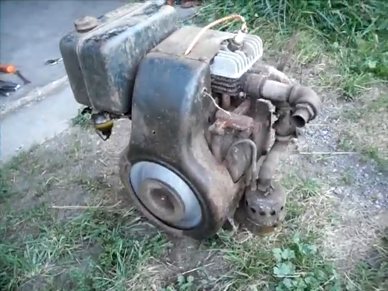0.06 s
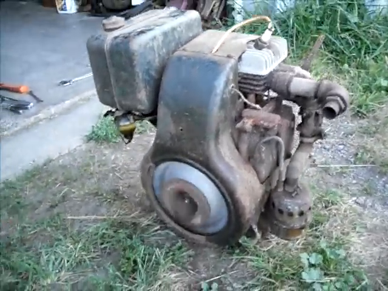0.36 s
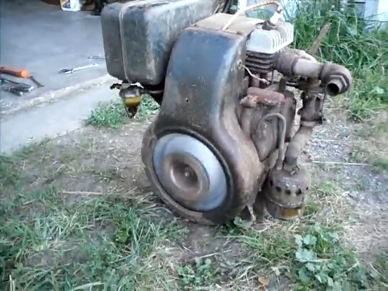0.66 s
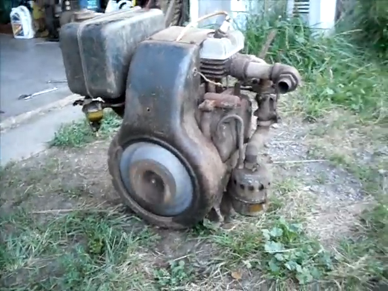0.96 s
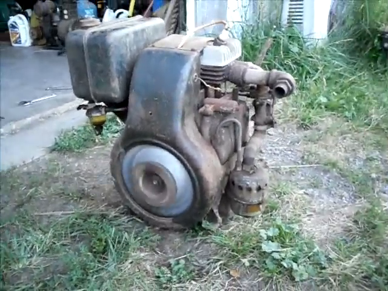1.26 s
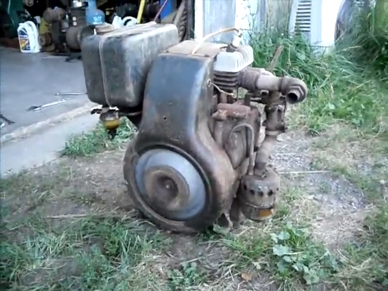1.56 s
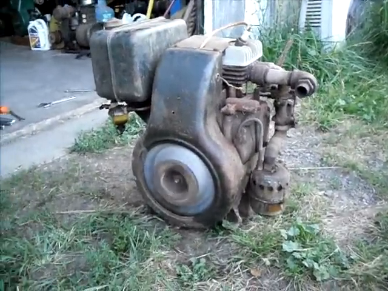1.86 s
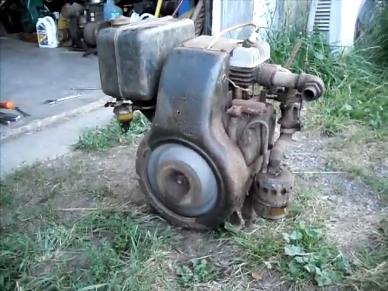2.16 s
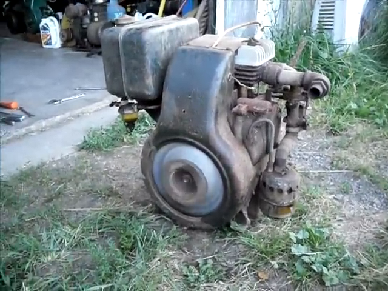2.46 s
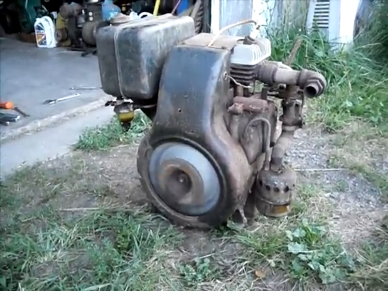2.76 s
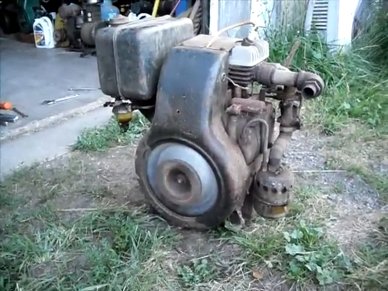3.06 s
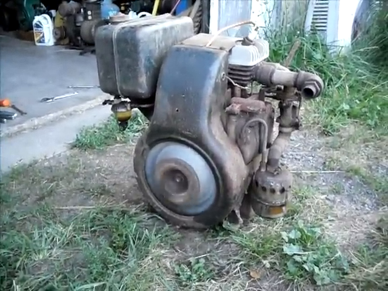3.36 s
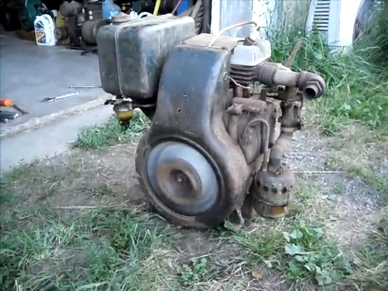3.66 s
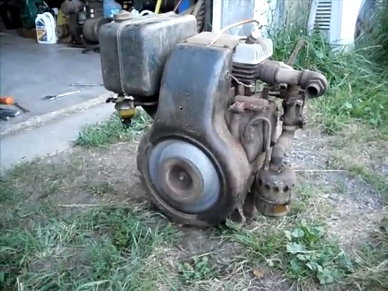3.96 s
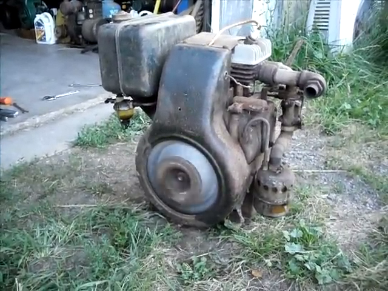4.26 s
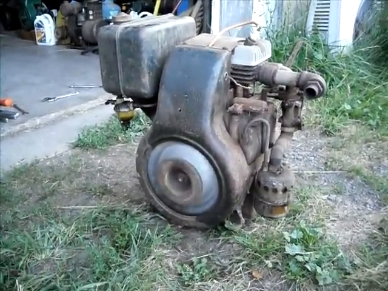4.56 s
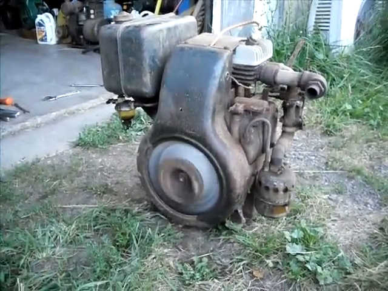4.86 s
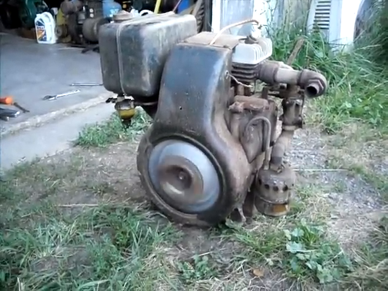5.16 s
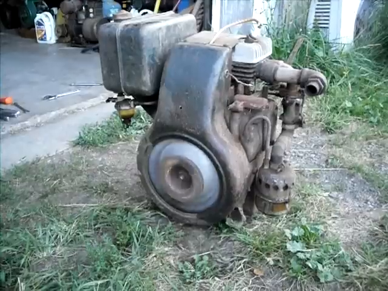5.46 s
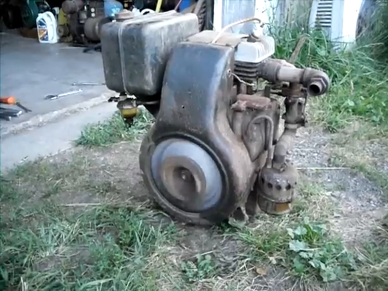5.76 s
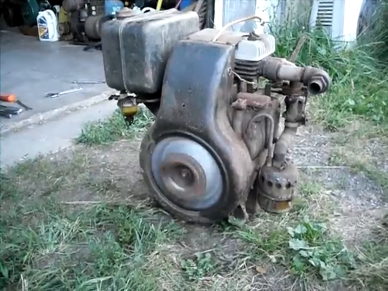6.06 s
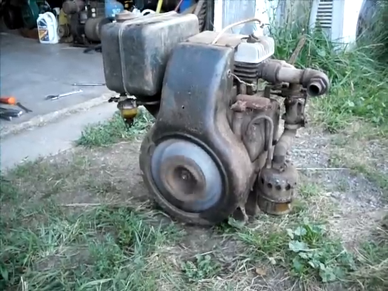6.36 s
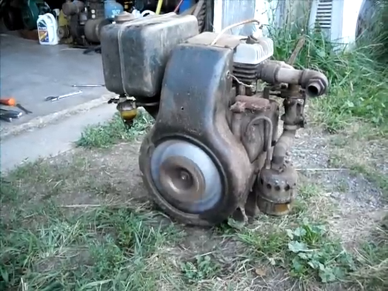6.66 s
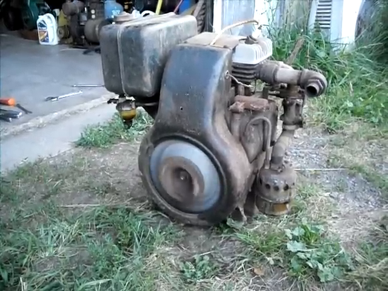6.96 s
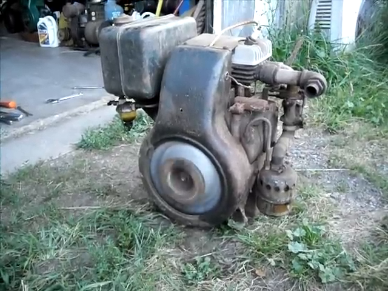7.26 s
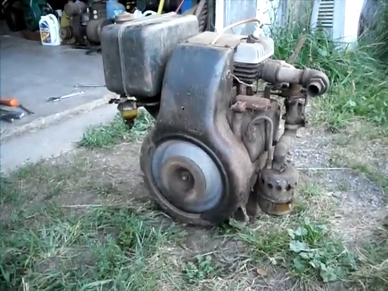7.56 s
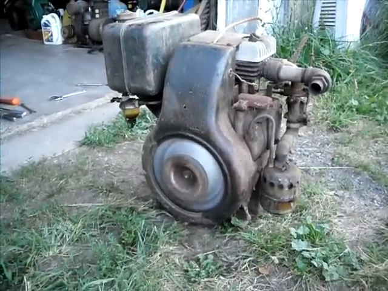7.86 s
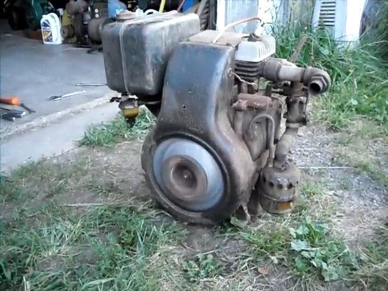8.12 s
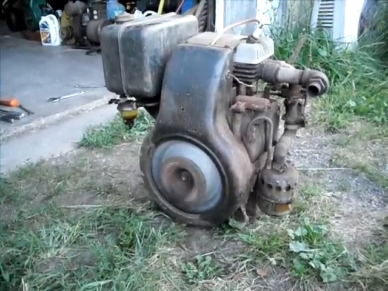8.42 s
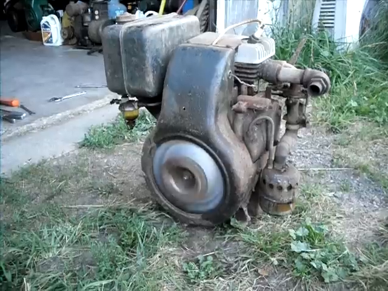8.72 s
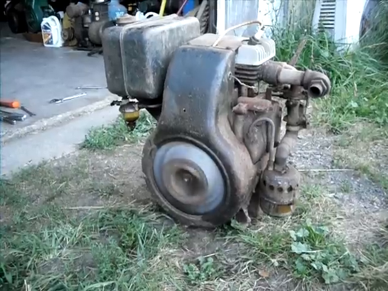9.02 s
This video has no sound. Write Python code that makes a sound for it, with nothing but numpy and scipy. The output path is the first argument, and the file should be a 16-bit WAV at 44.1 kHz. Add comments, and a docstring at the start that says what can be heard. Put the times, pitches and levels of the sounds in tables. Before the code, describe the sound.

An old single-cylinder petrol engine is already idling at the start and keeps running for the whole nine seconds, outdoors and about a step away. It chugs just under six times a second. Each beat has a low thump that slides quickly upward, a sharp crack from the short exhaust pipe and a brief sucking hiss, with iron clanks and bright valve ticks in between. A soft, steady fan whir lies underneath. Breeze buffets the microphone for the first half second, then sinks to a faint rumble. The idle wanders slightly, running fastest at about 3.6 seconds and slowest near 5.4. Harder pops stand out around 1.7, 5 and 8.4 seconds. At 7.5 seconds one firing almost misses, and another is softer near 9 seconds. The sound is close and dry, with the highest treble cut off.

```python
"""An old single-cylinder four-stroke petrol engine is already idling on grass, a step away, its flywheel
fan whirring underneath. Breeze buffets the microphone for the first half second, then falls back.
Just under six times a second, gas cracks out of the short open pipe, a thump glides up as the piston
shrinks the cylinder, the intake sucks and clatters, the inlet valve ticks shut and the next burn knocks
the block. The idle hunts, fastest at 3.6 s, and nearly misfires at 7.5 s."""
import sys
import numpy as np
from scipy import signal
from scipy.fft import rfft, irfft
from scipy.io import wavfile

SR = 44100
rng = np.random.default_rng(int(sys.argv[2]) if len(sys.argv) > 2 else 0)


def unload_audio(sound):
    """Save the sound as a 16-bit wav file, at the path given as the first command line argument."""
    columns = np.transpose(np.atleast_2d(sound))
    # keep every value between -1 and 1, then stretch to whole-number steps
    steps = np.round(np.clip(columns, -1, 1) * 32767)
    wavfile.write(sys.argv[1], SR, steps.astype(np.int16))


N = 405279
TIME = np.arange(N) / SR
FREQS = np.maximum(np.arange(N + 1) * SR / (2 * N), 1e-3)
TOP_HZ, CEILING_HZ = 6000, 16500


def amp(db):
    """Decibels to gain."""
    return 10 ** (np.asarray(db) / 20)


def curve(at, rows):
    """Straight lines through rows of (place, value)."""
    return np.interp(at, *np.transpose(rows))


def shape(x, response):
    """Filter with a response scaled so that white noise keeps its power."""
    return irfft(rfft(x, 2 * N) * response / np.sqrt(np.mean(abs(response) ** 2)))[:N]


def ring(x, modes, in_step=False):
    """Damped resonances; neighbours swing against each other, or in step with deep notches between."""
    sign = 1 if in_step else -1
    response = sum(sign ** k * amp(db) / (1 + 1j * (FREQS ** 2 - hz ** 2) / (FREQS * width))
                   for k, (hz, width, db) in enumerate(modes))
    return shape(x, response)


def noise(spectrum):
    """Unit-power noise with the given colour."""
    hz, db = np.transpose(spectrum)
    colour = amp(np.interp(np.log(FREQS), np.log(hz), db)) * (FREQS < TOP_HZ)
    return shape(rng.standard_normal(N), colour)


def chatter(per_s, spread_db):
    """Dense tiny impacts of uneven size, unit power."""
    clicks = (rng.random(N) < per_s / SR) * rng.choice([-1, 1], N)
    clicks = clicks * amp(spread_db * rng.standard_normal(N))
    return clicks / clicks.std()


# opening gusts that settle to a faint rumble: (time [s], level [dB])
GUSTS = [(0, -31), (.14, -46), (.2, -33), (.3, -36), (.48, -34), (.62, -45.5), (1.2, -58), (9.19, -51.5)]
def breeze():
    """Moving air buffets the microphone with a deep rumble."""
    rumble = noise([(15, -17.5), (35, -3.0), (110, -9.5), (250, -20.5), (900, -55.5)])
    return amp(curve(TIME, GUSTS)) * rumble


# colour of the whirring bed: (frequency [Hz], relative level [dB])
FAN_COLOUR = [(25, -5), (55, -2.5), (140, 1), (300, -14.5), (420, 0.5), (780, -2), (1300, -4.5),
              (1530, -11.5), (1700, -4.5), (3000, -13), (4700, -11.5), (6000, -31)]
def fan():
    """The flywheel fan stirs the air into a steady whir."""
    return amp(-35.5) * noise(FAN_COLOUR)


# tempo of the hunting idle: (time [s], firing rate [Hz])
IDLE_TEMPO = [(0.24, 5.684), (1.07, 5.904), (2.6, 5.814), (3.1, 5.873), (3.6, 6.238), (3.99, 6.12),
              (4.29, 5.677), (5.01, 5.594), (5.37, 5.505), (5.97, 5.605), (6.1, 5.815), (6.68, 6.064),
              (6.81, 5.909), (7.43, 5.956), (7.54, 5.657), (8.16, 5.842), (8.58, 5.618), (9.17, 5.531)]
def valve_openings(first_s=-.051):
    """The exhaust valve opens once every two crank turns: the times, and the firing rate at each."""
    clock = first_s + np.arange(N + SR // 2) / SR
    cycles = np.cumsum(curve(clock, IDLE_TEMPO)) / SR
    opens = np.interp(np.arange(int(cycles[-1]) + 1), cycles, clock)
    return opens, curve(opens, IDLE_TEMPO)


# rising bass note of the exhaust stroke: (phase [cycles], pitch [Hz], level [dB])
THUMP_GLIDE = [(0, 83, -34.5), (.012, 89.5, -20), (0.027, 98, -20.5), (0.059, 119.8, -6),
               (0.093, 130.3, -13.5), (0.134, 153.1, -13.5), (.235, 225.7, -20), (.28, 255, -31.5),
               (.4, 266, -63.5)]
def thump(phase, opened_s, lead_turns=0.032):
    """Cylinder gas is a spring on the air in the pipe; the rising piston stiffens it: the note climbs."""
    share, hz, db = np.transpose(THUMP_GLIDE)
    start = np.clip(opened_s * SR, 0, N - 1).astype(int)
    turns = np.cumsum(np.interp(phase, share, hz)) / SR
    return amp(np.interp(phase, share, db)) * np.sin(2 * np.pi * (turns - turns[start] + lead_turns))


def rattle(decay_s):
    """A dense run of tiny bounces that dies away: unit energy, no colour of its own."""
    fade = np.exp(-np.arange(4096) / SR / decay_s)
    bounces = rng.standard_normal(len(fade)) * fade
    for _ in range(4):
        whitened = irfft(np.exp(1j * np.angle(rfft(bounces))))
        bounces = whitened * fade ** .25
    return bounces / np.linalg.norm(bounces)


# each cycle's hits, among them tappet, exhaust valve seat, piston slap, inlet valve seat, ignition, knock:
# (phase [cycles], send to block [dB], send to valve gear [dB], rattle decay [s])
HIT_PATTERN = [(.003, -2, -16.5, 0.009), (.297, 2.5, -7, 0.0042), (.335, -3, -13, 0.004),
               (.39, -2.5, -7, 0.009), (.594, -6.5, 1, 0.0081), (.785, -11.5, -9, 0.0063),
               (.85, -10.5, -22.5, 0.01), (.88, -9, -22.5, 0.0039)]
def blows(opens, jitter_s=.0002, spread_db=1.5):
    """The same parts strike the same way in every cycle, so each blow keeps its own rattle."""
    on_block, on_valves = 0, 0
    for share, block_db, valve_db, decay_s in HIT_PATTERN:
        late, size = rng.standard_normal((len(opens) - 1, 2)).T
        at = ((opens[:-1] + share * np.diff(opens) + jitter_s * late) * SR).astype(int)
        heard = (at >= 0) & (at < N)
        hits = np.bincount(at[heard], amp(spread_db * size[heard]), N)
        force = signal.oaconvolve(hits, rattle(decay_s))[:N]
        on_block += amp(block_db) * force
        on_valves += amp(valve_db) * force
    return on_block, on_valves


# loose chatter of piston and gears between the blows: (phase [cycles], relative level [dB])
LOOSE_CHATTER = [(0, -40.5), (.12, -43.5), (.27, -39), (.5, -34.5), (.7, -42.5), (.78, -36.5), (.87, -31.5),
                 (.94, -48.5), (1, -45)]
# clank of the block and its sheet-metal cowling: (frequency [Hz], width [Hz], relative level [dB])
BLOCK_MODES = [(374.2, 24, 4.5), (422, 21, -1), (497.3, 25, 1.5), (508.7, 7.3, 1), (559, 4.7, -6),
               (634, 17, -2), (682, 12, -6), (756, 24, 8), (792, 13, 8.5), (800.5, 13, 10), (847, 12, 8),
               (916, 29, 0), (1037, 22, -2.5), (1097, 23, 3.5), (1205, 41, 0.5), (1241, 26, 5.5),
               (1261.4, 31, 6), (1363, 35, -1), (1438, 47, 0.5), (1614, 37, 2.5), (1684, 43, 3),
               (1813, 36, -1.5), (1968, 45, 0), (2084, 78, -3), (2173, 35, 1.5), (2328, 25, 5.5),
               (2406, 29, -1), (2572, 160, -5.5), (3115, 71, -3), (3250, 420, -7)]
# bright ring of valves, springs and their cover: (frequency [Hz], width [Hz], relative level [dB])
VALVE_MODES = [(2700, 9.5, 0), (2808, 28, 2.5), (2835, 40, -3.5), (2902, 24, 4.5), (3020, 22, 1),
               (3290, 120, -7), (3440, 12, 1.5), (3710, 67, -6.5), (3850, 76, -1), (3900, 38, -4),
               (4288, 21, -1), (4326, 14, -1), (4437, 86, -1), (4676, 65, -6), (5050, 200, -23),
               (5240, 170, -12)]
# level ride as the microphone drifts nearer the block or away: (time [s], gain [dB])
CLOSENESS = [(0, 1.5), (.6, 1.5), (1.3, 0.1), (2.3, 0), (3.6, 0.5), (4.6, -0.55), (7, 0), (9.19, -1)]
def clatter(opens, phase):
    """Regular blows and loose chatter ring the iron block and the valve gear."""
    on_block, on_valves = blows(opens)
    loose = amp(curve(phase, LOOSE_CHATTER)) * chatter(per_s=2000, spread_db=4.5)
    iron = ring(on_block + amp(1.5) * loose, BLOCK_MODES)
    valve_gear = ring(on_valves + amp(-9.5) * loose, VALVE_MODES)
    return amp(curve(TIME, CLOSENESS)) * (iron + valve_gear)


# envelope of one gulp of air: (phase [cycles], level [dB])
GULP_ENVELOPE = [(0, -60), (.25, -45), (.315, -23.5), (.355, -28.5), (.41, -34.5), (.5, -55.5), (.6, -45.5),
                 (1, -59)]
# colour of its hiss: (frequency [Hz], relative level [dB])
GULP_COLOUR = [(280, -9), (380, -0.5), (750, -2.5), (1350, 0.5), (1530, -10), (1700, -7.5), (2200, -15),
               (2700, -2), (2950, 4), (3800, 0), (4400, -10.5), (5000, -1.5), (6000, -19)]
def intake(phase, cycle, spread_db=1):
    """Air is sucked through the carburettor, each gulp a little louder or softer."""
    strength = amp(spread_db * rng.standard_normal(cycle.max() + 1))
    return amp(curve(phase, GULP_ENVELOPE)) * strength[cycle] * noise(GULP_COLOUR)


# ring of the short exhaust pipe: (frequency [Hz], width [Hz], relative level [dB])
PIPE_MODES = [(420, 34, -12.5), (563, 33, -11), (760, 60, -1.5), (1450, 68, -4.5), (1630, 77, -14),
              (2210, 140, -20.5), (3070, 280, -7.5), (3220, 130, 0), (3810, 320, 3.5), (4510, 120, 3),
              (4666, 110, 1.5), (5400, 120, -15.5)]
def crack(age, cycle, peak_s=0.0055, width_s=.0014, tail_db=-21, tail_s=0.007, eddy_hz=5300):
    """A brief turbulent jet tears past the opening valve and rings the pipe; its finest eddies are weak."""
    burst = np.exp(-.5 * ((age - peak_s) / width_s) ** 2)
    tail = amp(tail_db) * np.exp(-abs(age - peak_s) / tail_s)
    lowpass = signal.butter(8, eddy_hz, fs=SR, output="sos")
    eddies = signal.sosfilt(lowpass, chatter(per_s=9000, spread_db=-2))
    jet = ring((burst + tail) * eddies, PIPE_MODES, in_step=True)
    # even out the cracks, so that the pressure each burn leaves sets their energy
    energy = np.maximum(np.bincount(cycle, jet ** 2), 1)
    return amp(7) * jet / np.sqrt(energy[cycle])


# accents: hard and weak burns, one a near misfire: (time [s], thump gain [dB], crack gain [dB])
BURN_ACCENTS = [(1.16, -0.2, 0.5), (1.67, .3, 3.5), (2.18, 0.2, 0.7), (3.21, 0.6, 2), (4.37, 0, 1.5),
                (4.9, 0.7, 3), (5.08, 1, 4.5), (7.16, 0.4, 1), (7.5, -2.5, -17), (7.68, -0.2, 1),
                (8.37, 0.2, 3), (9.08, -0.5, -7)]
def burns(opens, firing_hz, idle_hz=5.77, crack_db_per_hz=-4.5):
    """Thump and crack gain of each burn: both vary by chance; ordinary cracks soften as speed rises."""
    luck = rng.standard_normal(len(opens))
    thump_db = 0.42 * luck
    crack_db = -1.73 + crack_db_per_hz * (firing_hz - idle_hz) + 1.46 * luck
    for at, accent_thump_db, accent_crack_db in BURN_ACCENTS:
        nearest = np.argmin(abs(opens - at))
        thump_db[nearest], crack_db[nearest] = accent_thump_db, accent_crack_db
    return thump_db, crack_db


def scene():
    """One crank angle times exhaust, intake and clatter over the bed of fan and breeze."""
    opens, firing_hz = valve_openings()
    thump_db, crack_db = burns(opens, firing_hz)
    cycle = np.clip(np.searchsorted(opens, TIME, side="right") - 1, 0, len(opens) - 2)
    age = TIME - opens[cycle]
    phase = age / np.diff(opens)[cycle]  # 0 to 1 between exhaust openings
    thumps = amp(thump_db[cycle]) * thump(phase, opens[cycle])
    cracks = amp(crack_db[cycle]) * crack(age, cycle)
    return (thumps + cracks + intake(phase, cycle) + fan() + breeze() + clatter(opens, phase))[None]


def record(dry, limit=0.67, hardness=10):
    """A small camera passes a narrow band and rounds off the hardest cracks, which splash above it."""
    thin = signal.sosfilt(signal.butter(1, 18, "high", fs=SR, output="sos"), dry)
    soft = signal.sosfilt(signal.butter(8, 5450, fs=SR, output="sos"), thin)
    narrow = signal.sosfilt(signal.ellip(8, .2, 70, TOP_HZ, fs=SR, output="sos"), soft)
    rounded = narrow / (1 + abs(narrow / limit) ** hardness) ** (1 / hardness)
    return signal.sosfilt(signal.ellip(8, .2, 70, CEILING_HZ, fs=SR, output="sos"), rounded)


dry = scene()
out = record(dry)
unload_audio(out)
```